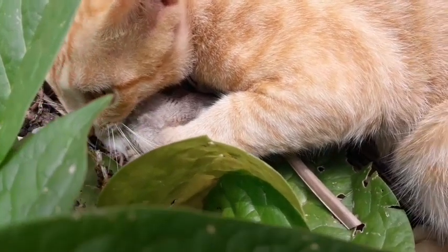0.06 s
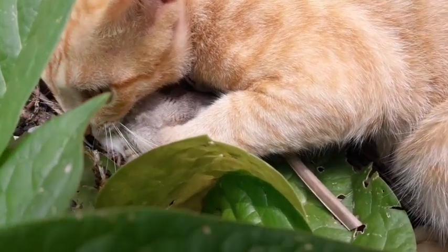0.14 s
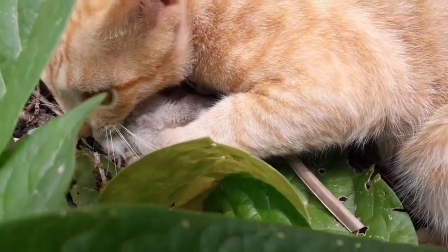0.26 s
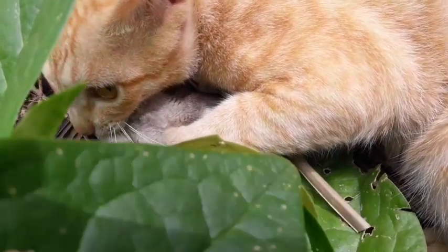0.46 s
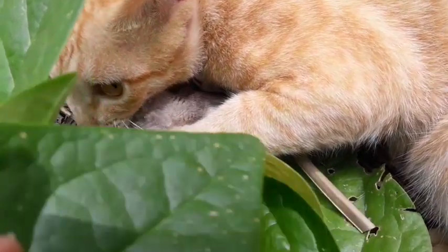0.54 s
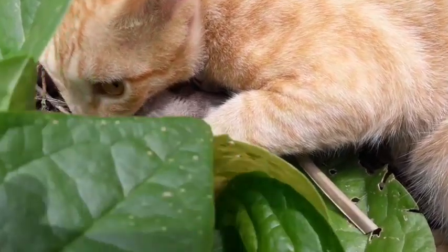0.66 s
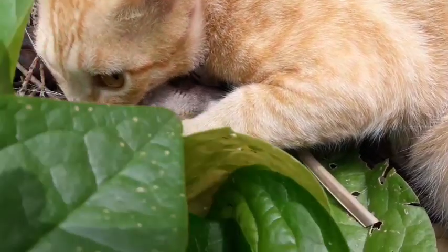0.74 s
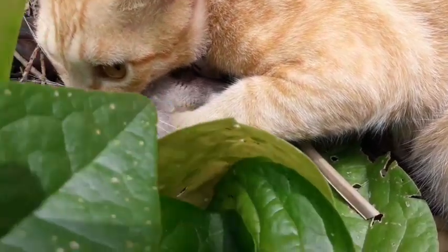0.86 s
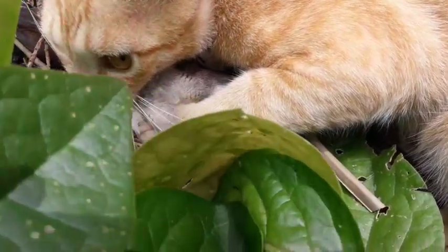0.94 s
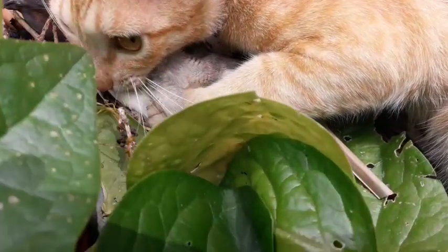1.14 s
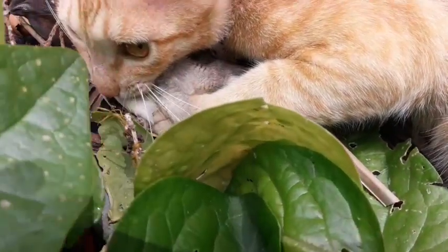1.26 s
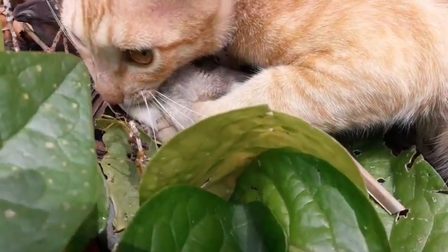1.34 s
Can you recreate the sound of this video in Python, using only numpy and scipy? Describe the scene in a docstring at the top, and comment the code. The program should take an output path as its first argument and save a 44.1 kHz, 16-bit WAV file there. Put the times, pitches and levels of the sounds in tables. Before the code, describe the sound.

One high, hoarse rodent squeal sounds near the microphone and slides downward while leaves crackle under a cat. A few more ticks follow, and a distant bird chirps over a soft breeze and low rumble outdoors.

```python
"""A distant bird chirps over a low rumble, a breeze and a thin outdoor hiss. At 0.2 s a small rodent,
pinned by a cat among leaves, gives one squeal: a harmonic tone, rasping at first as a flutter of the
throat modulates it, then a clearer whistle, falling in pitch to end at 0.8 s. Leaves under the cat
tick and rustle, as single impulses and dense clicks, during the cry and after it.
Near 1 s the bird chirps again, and a few last ticks follow."""
import sys
import numpy as np
from scipy import signal
from scipy.fft import rfft, irfft
from scipy.io import wavfile

SR = 44100
rng = np.random.default_rng(int(sys.argv[2]) if len(sys.argv) > 2 else 0)


def file_out(sig):
    """Save sig as 16-bit WAV at sys.argv[1]."""
    # one column per channel
    cols = np.atleast_2d(sig).T
    # limit, then scale
    lim = np.clip(cols, -1, 1)
    pcm = np.round(lim * 32767).astype(np.int16)
    wavfile.write(sys.argv[1], SR, pcm)


N = 61739
T = np.arange(N) / SR


def amp(db):
    """Amplitude ratio of a level in decibels."""
    return 10 ** (np.asarray(db) / 20)


def unit(x):
    """Normalisation to rms 1."""
    return x / np.sqrt(np.mean(x ** 2) + 1e-20)


def curves(table):
    """Linear interpolation of each column over time."""
    times, *columns = np.transpose(table)
    return [np.interp(T, times, c) for c in columns]


def value_at(spectrum, hz):
    """Interpolation on a log-frequency axis."""
    f, value = np.transpose(spectrum)
    return np.interp(np.log(hz + 1), np.log(f + 1), value)


def colour(x, spectrum):
    """Filtering by multiplication of spectra."""
    return irfft(rfft(x) * amp(value_at(spectrum, np.fft.rfftfreq(N, 1 / SR))), N)


def noise(spectrum):
    """Filtered Gaussian noise of rms 1."""
    return unit(colour(rng.standard_normal(N), spectrum))


def wander(hz):
    """Random modulation: low-pass noise of rms 1."""
    rolloff = (1 + (np.fft.rfftfreq(N, 1 / SR) / hz) ** 2) ** 2
    return unit(irfft(rfft(rng.standard_normal(N)) / rolloff, N))


def phase(hz):
    """Phase as the integral of frequency."""
    return 2 * np.pi * np.cumsum(hz) / SR


# Spectra of rumble, wind in the plants and hiss (frequency [Hz], relative density [dB])
RUMBLE_SPECTRUM = [(20, -52), (30, -46), (42, -31), (60, -9.5), (80, -12), (105, -2.5), (140, -2.5),
                   (190, -4), (250, -2), (320, -24.5), (450, -19.5), (700, -39.5), (1200, -79.5)]
BREEZE_SPECTRUM = [(100, -10.5), (250, 2.5), (400, 5.5), (650, -11.5), (1000, -23), (1600, -3), (3000, -27),
                   (8000, -70)]
HISS_SPECTRUM = [(300, 0), (450, -14.5), (700, -17), (1000, -13.5), (1600, -15), (2500, -21), (3500, -5.5),
                 (4800, -2.5), (6500, -0.5), (7400, 7), (8000, -1.5), (10000, -3), (12500, -11),
                 (15600, -16)]
# Envelopes of rumble and wind (time [s], level [dB])
RUMBLE_LEVEL = [(0, -50), (.2, -48), (.5, -50), (.8, -49.5), (1.0, -47), (1.2, -51), (1.28, -62),
                (1.4, -51)]
BREEZE_LEVEL = [(0, -63), (.3, -64), (.6, -57.5), (.9, -52.5), (1.1, -56), (1.27, -71), (1.4, -85)]
def outdoor_noise(hiss_db=-53):
    """Superposition of independent noises: slowly varying rumble and breeze, and a steady hiss."""
    rumble = amp(curves(RUMBLE_LEVEL)[0]) * noise(RUMBLE_SPECTRUM)
    breeze = amp(curves(BREEZE_LEVEL)[0]) * noise(BREEZE_SPECTRUM)
    return rumble + breeze + amp(hiss_db) * noise(HISS_SPECTRUM)


# Fundamental of the hum (time [s], frequency [Hz], level [dB])
HUM_TONE = [(0, 119.5, -51.5), (.2, 125.5, -50.5), (.45, 124.5, -54.5), (.62, 136.8, -51.5),
            (.82, 140.9, -46.5), (.98, 130.9, -51.5), (1.15, 125.3, -54), (1.3, 101.7, -59.5),
            (1.4, 96.3, -51)]
def hum(waver=0.026, octave_db=-7.5):
    """Two harmonics under slow frequency modulation, like a far engine."""
    hz, db = curves(HUM_TONE)
    angle = phase(hz * (1 + waver * wander(17)))
    return np.sqrt(2) * amp(db) * (np.sin(angle) + amp(octave_db) * np.sin(2 * angle))


# Outdoor decay (frequency [Hz], reverberation time [s])
YARD_T60 = [(200, 0.4), (1500, 0.49), (3000, 0.68), (7000, 0.76), (15000, 0.43)]
def yard(x):
    """Diffuse reverberation: each band decays exponentially at its own rate."""
    hz, t, bands = signal.stft(rng.standard_normal(SR), SR, nperseg=256)
    decay = amp(-60 * t / value_at(YARD_T60, hz)[:, None])
    tail = signal.istft(bands * decay, SR, nperseg=256)[1]
    return signal.fftconvolve(x, tail / np.linalg.norm(tail))[:N]


def foliage(x, echoes_per_s=2000, decay_s=0.025):
    """Early reflections, scattered by the ground and nearby leaves."""
    taps = rng.standard_normal(N) * (rng.random(N) < echoes_per_s / SR) * np.exp(-T / decay_s)
    return signal.fftconvolve(x, taps / np.linalg.norm(taps))[:N]


# Chirps (time [s], duration [s], start frequency [Hz], end frequency [Hz], level [dB])
BIRD_NOTES = [(0.074, 0.072, 7170, 5810, -48), (0.1, 0.057, 1745, 1724, -60.5),
              (0.119, 0.071, 5870, 2940, -49.5), (0.976, 0.041, 4937, 3830, -45),
              (1.001, 0.036, 3305, 2623, -45), (1.06, 0.02844, 2636, 2386, -52.5),
              (1.109, 0.033, 4920, 4640, -49.5), (1.112, 0.056, 4360, 3870, -48),
              (1.154, 0.049, 4300, 3900, -54)]
def bird(scatter_hz=600):
    """Spectral broadening: scattering by plants smears falling whistles, the higher ones most."""
    out = np.zeros(N)
    for start, length, from_hz, to_hz, db in BIRD_NOTES:
        progress = np.clip((T - start) / length, 0, 1)
        angle = phase(from_hz + (to_hz - from_hz) * progress)
        scattering = (from_hz / 3000) ** 4
        width_hz = scatter_hz * scattering / (1 + scattering)
        note = wander(width_hz) * np.sin(angle) + wander(width_hz) * np.cos(angle)
        out += amp(db) * np.sin(np.pi * progress) * note
    return out


# Spectrum of rubbing leaves (frequency [Hz], relative density [dB])
LEAF_SPECTRUM = [(200, 0), (800, -3.5), (2000, 2.5), (3000, 4), (5000, 1.5), (7200, 5.5), (8200, -20.5),
                 (12000, -5), (15600, -13)]
# Envelope of the rubbing (time [s], level [dB])
RUSTLE_LEVEL = [(0, -60), (.17, -93), (.21, -47.5), (.45, -47.5), (.64, -49.5), (.8, -53), (.88, -52.5),
                (.9, -40), (.935, -47.5), (.96, -53), (1.05, -65), (1.1, -72), (1.19, -61), (1.27, -71),
                (1.325, -55.5), (1.35, -64), (1.4, -64)]
def rustle(clicks_per_s=7400, spread_db=0.3):
    """Shot noise: friction between leaves gives dense tiny clicks of uneven size."""
    clicks = (rng.random(N) < clicks_per_s / SR) * rng.standard_normal(N)
    clicks *= amp(spread_db * np.minimum(rng.exponential(1, N), 4))
    return amp(curves(RUSTLE_LEVEL)[0]) * unit(colour(clicks, LEAF_SPECTRUM))


# Leaf ticks and paw bumps (time [s], snap [dB], thud [dB], thud frequency [Hz], crisp treble [dB])
CONTACTS = [(0.198, -33, -30, 246, -38.5), (0.362, -57, -28, 307.7, -60), (0.387, -33, -29.5, 502, -40),
            (0.443, -31, -39, 694, -36), (.47, -23, -36.5, 637, -48), (.484, -32, -26.5, 582, -49),
            (0.503, -32, -32, 365, -62), (0.614, -34, -37.5, 510, -58), (0.834, -36, -41, 387, -71.5),
            (.862, -25.5, -26.5, 393, -62), (1.049, -32.5, -66, 510, -65), (1.172, -38, -64, 600, -42),
            (1.196, -44.5, -68, 500, -60), (1.31, -42.5, -73, 389.3, -41.5),
            (1.323, -52.5, -37.5, 304, -61)]
# Filters of the snap and its crisp treble (frequency [Hz], gain [dB])
SNAP_FILTER = [(200, 3), (800, -1.5), (1500, -1), (3000, -4.5), (5000, 5), (7200, -0.5), (8200, -23),
               (15600, -29)]
CRISP_FILTER = [(3000, -24.5), (8000, 7), (12000, 1), (15600, -5)]
def ticks(snap_s=0.00063, tail_s=0.005, tail_db=-13.5, thud_rise_s=0.0019, thud_decay_s=0.0021):
    """Impulsive excitation: a leaf snaps, with a faint crumbling tail, over a damped low oscillation."""
    snaps, treble, thuds = np.zeros((3, N))
    crumble, grit = rng.standard_normal(N), rng.choice([-1., 1.], N)
    for start, snap_db, thud_db, hz, crisp_db in CONTACTS:
        t = np.maximum(T - start, 0)
        tail = amp(tail_db) * crumble * np.exp(-t / tail_s)
        crack = (T >= start) * (grit * np.exp(-t / snap_s) + tail)
        snaps += amp(snap_db) * crack
        snaps[round(start * SR)] -= 2.46 * amp(snap_db)  # the clean break that opens the snap
        treble += amp(crisp_db) * crack
        envelope = (1 - np.exp(-t / thud_rise_s)) * np.exp(-t / thud_decay_s)
        thuds += 2 * amp(thud_db) * envelope * np.sin(2 * np.pi * hz * t)
    return colour(snaps, SNAP_FILTER) + colour(treble, CRISP_FILTER) + thuds


JITTER_HZ, WHISTLE_JITTER = 330, 0.015  # bandwidth of the throat's unsteadiness; rms share of pitch

# Opening squeaks (time [s], duration [s], start frequency [Hz], end frequency [Hz], level [dB])
SQUEAKS = [(0.22, 0.075, 1975, 1900, -35), (.222, 0.084, 2270, 2100, -40), (0.21, 0.013, 4090, 4090, -37.5),
           (.24, .085, 5130, 5250, -37), (.242, .11, 7280, 6750, -40)]
def squeaks():
    """Onset transient: the voice catches on higher tones before it settles."""
    out = np.zeros(N)
    for start, length, from_hz, to_hz, db in SQUEAKS:
        progress = np.clip((T - start) / length, 0, 1)
        hz = (from_hz + (to_hz - from_hz) * progress) * (1 + WHISTLE_JITTER * wander(JITTER_HZ))
        out += amp(db) * np.sin(np.pi * np.sqrt(progress)) * np.sin(phase(hz))
    return out


# Spectrum of the rasp (frequency [Hz], relative density [dB])
RASP_SPECTRUM = [(700, -54), (1100, -16.5), (1500, 7.5), (2200, 1.5), (2700, -3.5), (3400, -9.5), (4300, 0),
                 (5150, -2), (5800, -7), (7000, -2.5), (8200, -21.5), (12000, -35.5), (13500, -31),
                 (15600, -32)]
def rasp(flutter_phase, buzz_share=0.41, ring_s=0.0021):
    """Pulse-train excitation: one puff per flutter cycle makes a buzz, mixed with breath noise."""
    pulses = np.diff(np.floor(flutter_phase / (2 * np.pi)), prepend=0)
    puff = rng.standard_normal(N) * np.exp(-T / ring_s)
    buzz = unit(colour(signal.fftconvolve(pulses, puff)[:N], RASP_SPECTRUM))
    return np.sqrt(buzz_share) * buzz + np.sqrt(1 - buzz_share) * noise(RASP_SPECTRUM)


# Independent whistle of the throat (time [s], frequency [Hz], level [dB])
SECOND_TONE = [(.232, 1770, -86), (.245, 1765, -27), (.29, 1765, -35.5), (.34, 1786, -32), (.38, 1748, -32),
               (.44, 1759, -35.5), (.48, 1690, -41), (.55, 1736, -44), (.6, 1740, -65)]
def second_whistle(voice_phase, combination_db=-16):
    """Biphonation: a tone at f2 beats against the voice at f1, with a combination tone at 2 f1 - f2."""
    hz, db = curves(SECOND_TONE)
    angle = phase(hz * (1 + WHISTLE_JITTER * wander(JITTER_HZ)))
    return np.sqrt(2) * amp(db) * (np.sin(angle) + amp(combination_db) * np.sin(2 * voice_phase - angle))


# Harmonic levels (time [s], first [dB], second [dB], third [dB], others below 8200 Hz [dB], above [dB])
HARMONIC_LEVELS = [(.195, -63, -75, -51, -75, -59), (.218, -48, -58, -66, -70, -80),
                   (.232, -30, -53, -61, -51, -75), (.248, -39.5, -42, -45, -43, -75),
                   (.275, -21, -28, -33.5, -54, -56), (.298, -22, -18, -37, -39, -53),
                   (.33, -23.5, -19.5, -34, -37.5, -45), (.365, -33, -20, -38, -38.5, -51),
                   (.392, -23.5, -19, -40.5, -39.5, -51), (.42, -33.5, -21, -38, -46.5, -51.5),
                   (.475, -35, -22.5, -41, -40.5, -46), (.508, -44, -30, -39, -49.5, -52),
                   (.526, -29, -40, -46, -42.5, -47), (.556, -35.5, -29.5, -53, -48.5, -51.5),
                   (.602, -27.5, -31, -65, -51, -48.5), (.635, -32, -35, -51.5, -51, -51.5),
                   (.666, -25.5, -41, -76, -54, -45.5), (.695, -33, -43.5, -56, -43, -54),
                   (.748, -34.5, -43, -60, -60.5, -61), (.77, -45, -50, -51, -53, -68),
                   (.79, -93, -78, -45.5, -66, -62)]
# Throat response above the third harmonic (frequency [Hz], gain [dB])
THROAT_FILTER = [(4000, -6), (5800, -4.5), (6500, -2.5), (7400, -0.5), (8200, -22.5), (10500, -12),
                 (12000, -10), (13400, 0), (14500, -5), (15600, -9)]
def voice(hz, angle, jitter, flicker_db=3.5):
    """Source and filter: a harmonic series shaped by the throat, the upper partials hazy and flickering."""
    first, second, third, upper, top = curves(HARMONIC_LEVELS)
    levels = [first, second, third]
    levels += [np.where(k * hz < 8200, upper, top) + value_at(THROAT_FILTER, k * hz) for k in range(4, 12)]
    out = np.zeros(N)
    for k, db in enumerate(levels, 1):
        phase_noise = ((k > 2) * 20 * jitter + (k > 5) * 0.07) * wander(170)
        flicker = (k > 3) * flicker_db * np.tanh(wander(45))
        shimmer = 1 + 2.9 * jitter * wander(JITTER_HZ)
        out += amp(db + flicker) * shimmer * np.sin(k * (angle + phase_noise)) * (k * hz < SR / 2)
    return np.sqrt(2) * out


# Fundamental of the squeal (time [s], frequency [Hz])
SQUEAL_PITCH = [(.2, 2080), (.232, 1954), (.238, 1699), (.28, 1682), (.305, 1663), (.335, 1622),
                (.368, 1591), (.388, 1626), (.41, 1603), (.465, 1610), (.505, 1575), (.53, 1566),
                (.565, 1505), (.62, 1484), (.665, 1466), (.705, 1396), (.735, 1289), (.755, 1177),
                (.78, 946)]
# Hoarseness (time [s], flutter strength [0-1], jitter [share of pitch], rasp level [dB])
HOARSENESS = [(.2, 0.4, 0.007, -78), (.235, 0.5, 0.016, -47), (.243, 0.8, 0.025, -33),
              (.265, 0.64, 0.024, -29), (.29, 0.65, 0.01323, -38), (.345, 0.35, 0.02, -37.5),
              (.39, 0.27, 0.011, -47), (.45, 0.06, 0.0034, -37.5), (.52, 0.16, 0.005, -53.5),
              (.6, 0.15, 0.0041, -48.5), (.7, 0.13, 0.004, -51.5), (.755, 0, 0.0098, -46.5),
              (.8, 0.17, 0.0056, -82)]
def squeal(start_s=0.189, end_s=0.804, fade_s=0.012, flutter_hz=153.65, weak_pinch=0.44):
    """Amplitude and frequency modulation: the fluttering throat pinches the voice once a cycle."""
    hz, = curves(SQUEAL_PITCH)
    strength, jitter, rasp_db = curves(HOARSENESS)
    flutter_phase = phase(flutter_hz * (1 + 0.018 * wander(33)))
    subharmonic = np.sin(flutter_phase / 2)  # period doubling: every other pinch is weaker
    pinch = abs(subharmonic) ** 5.6 * np.where(subharmonic > 0, 1, weak_pinch)
    flutter = 2 * strength * (pinch.mean() - pinch)
    angle = phase(hz * (1 + 0.069 * flutter + jitter * wander(JITTER_HZ)))
    tone = voice(hz, angle, jitter)
    whistle = second_whistle(angle)
    hoarse_tone = (tone + amp(rasp_db) * rasp(flutter_phase)) * (1 + 0.47 * flutter)
    gate = np.clip(np.minimum(T - start_s, end_s - T) / fade_s, 0, 1)
    return gate * (whistle + hoarse_tone)


def scene():
    """Direct and reflected sound add over the background; the far bird is the more reverberant."""
    near = squeaks() + squeal() + ticks() + rustle()
    far = bird()
    reflected = amp(-11) * foliage(near) + yard(amp(-13) * near + amp(-4) * far)
    return (near + amp(-1.5) * far + reflected + hum() + outdoor_noise())[None]


def record(dry, cutoff_hz=15600):
    """Band limiting by a linear-phase low-pass filter."""
    lowpass = signal.firwin(511, cutoff_hz, window=("kaiser", 9), fs=SR)
    return signal.oaconvolve(dry, lowpass[None], "same")


dry = scene()
out = record(dry)
file_out(out)
```